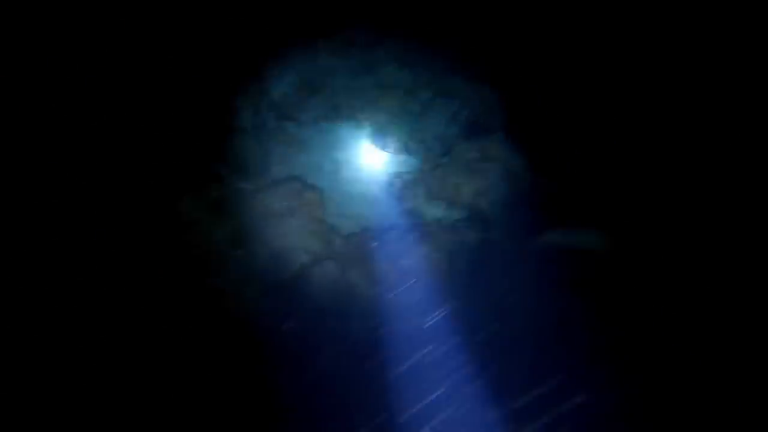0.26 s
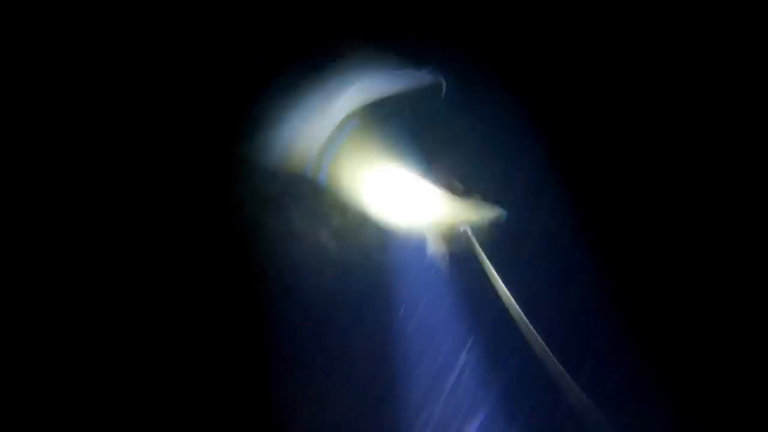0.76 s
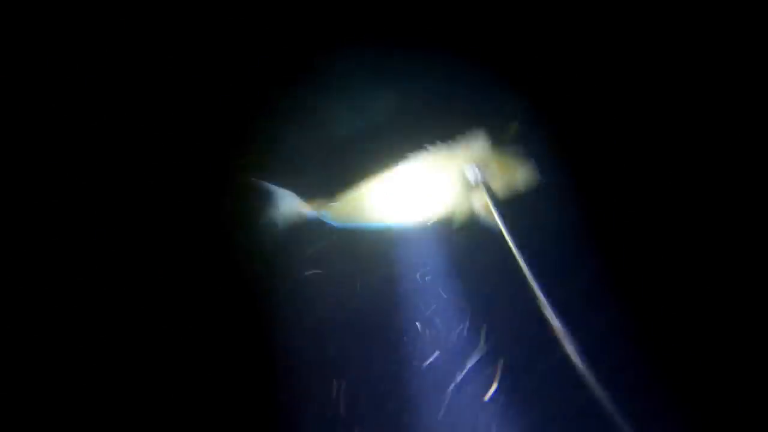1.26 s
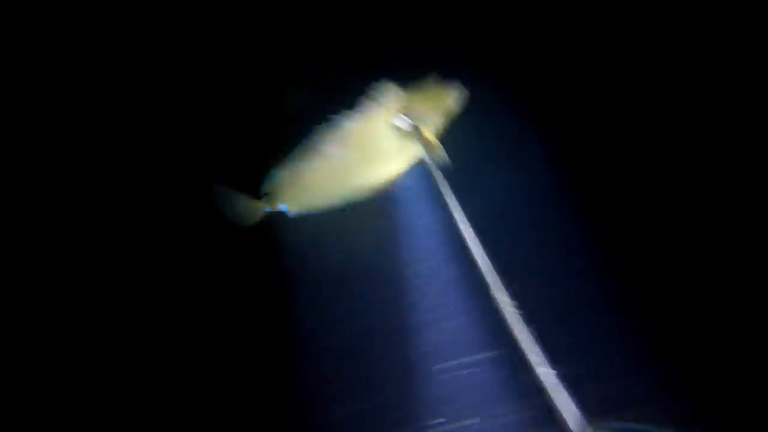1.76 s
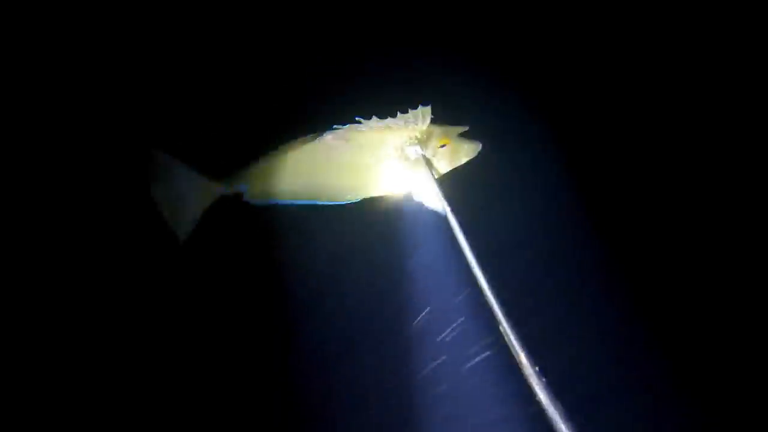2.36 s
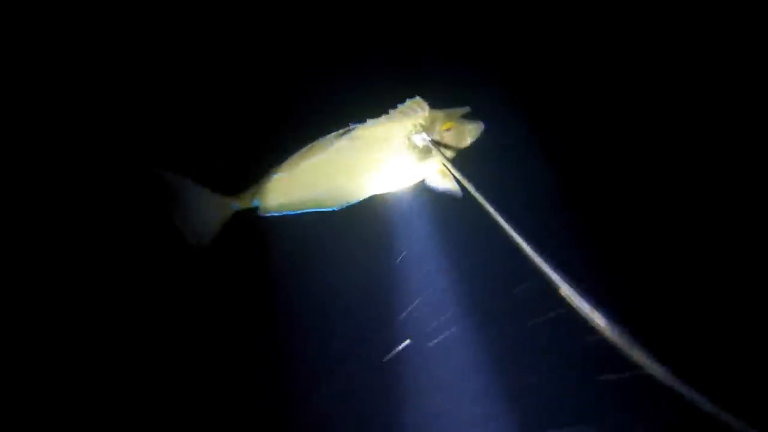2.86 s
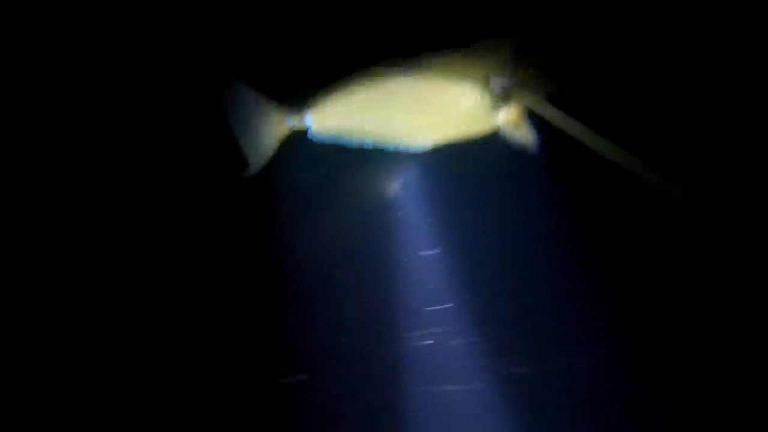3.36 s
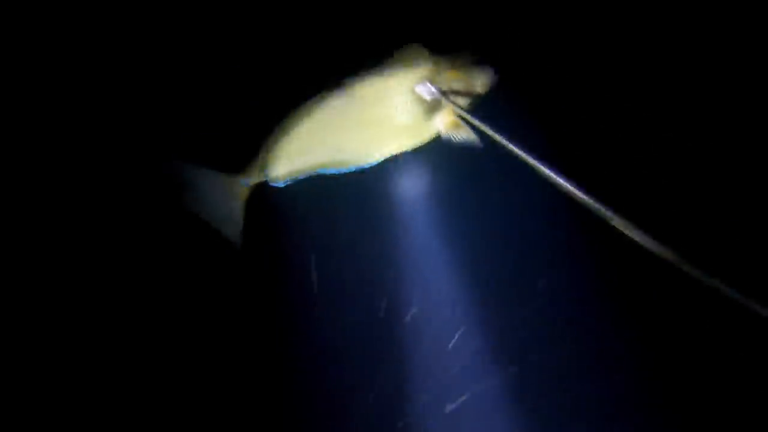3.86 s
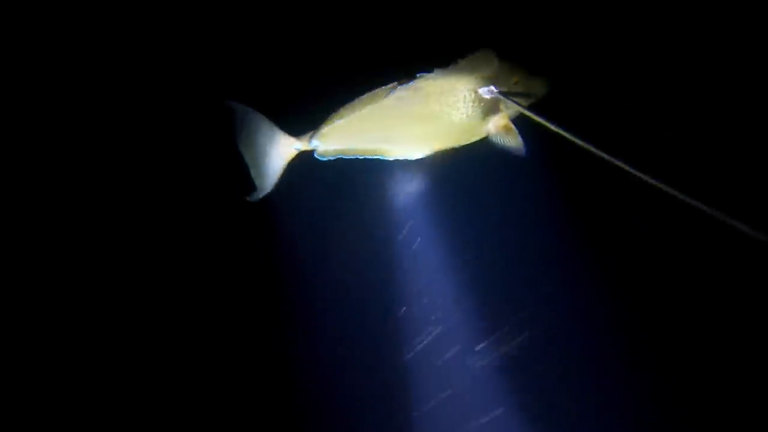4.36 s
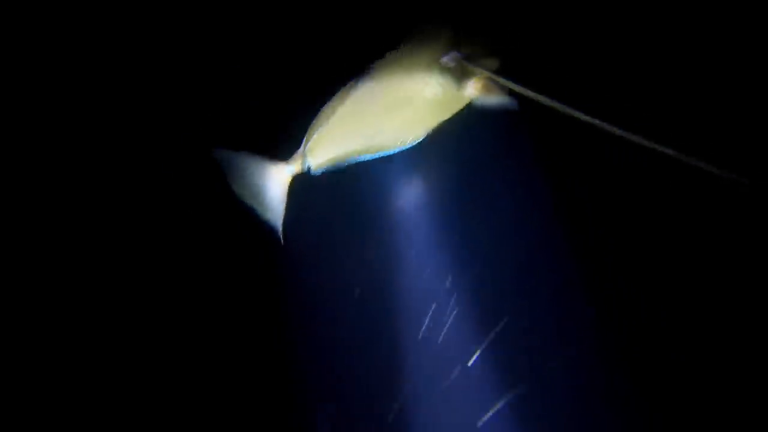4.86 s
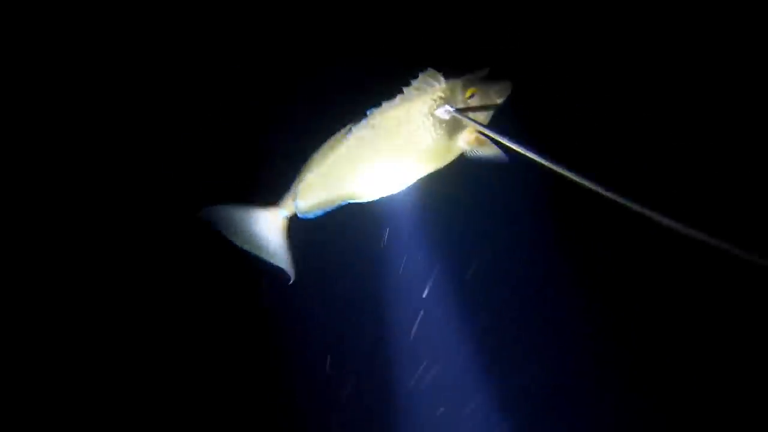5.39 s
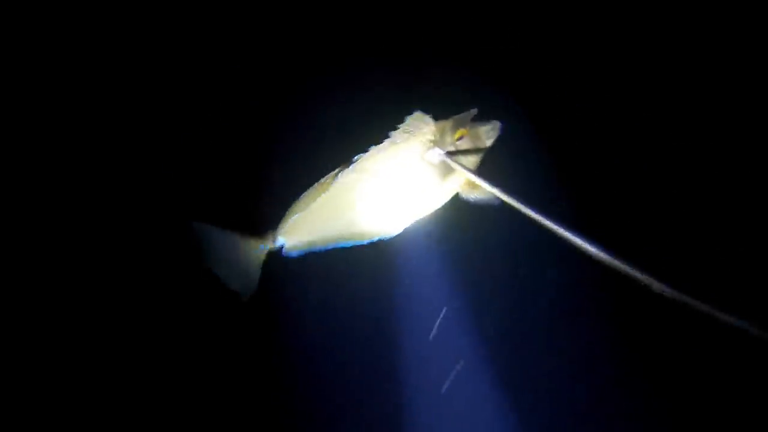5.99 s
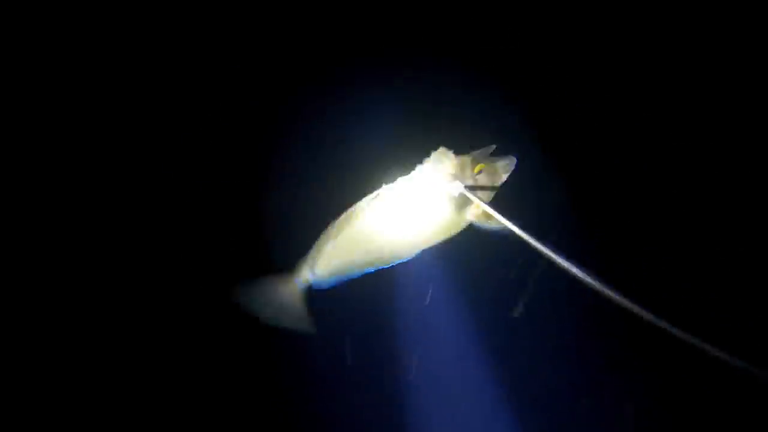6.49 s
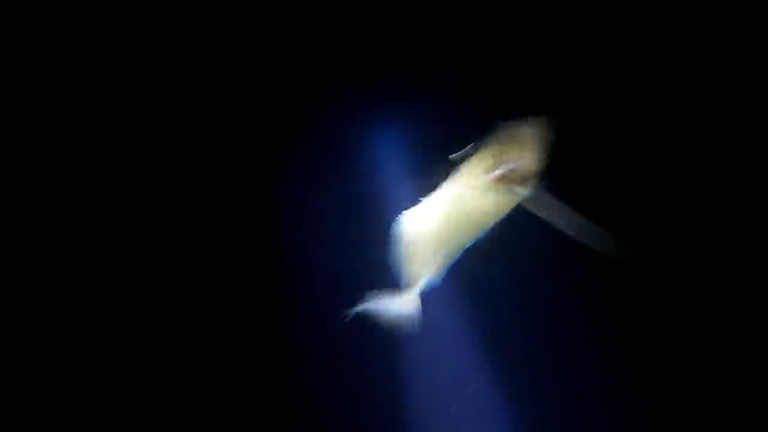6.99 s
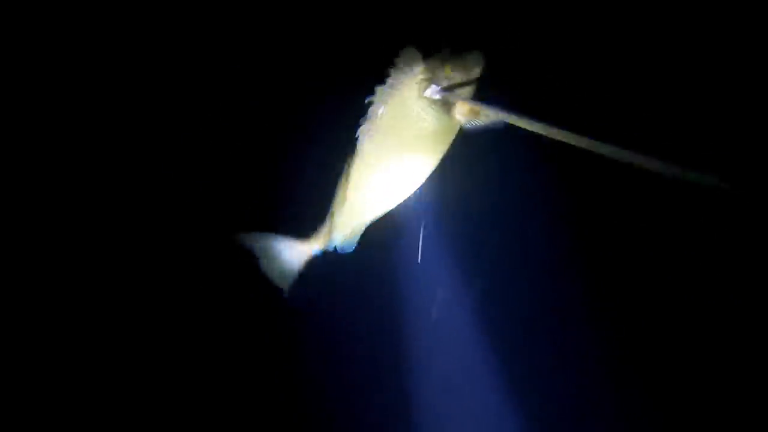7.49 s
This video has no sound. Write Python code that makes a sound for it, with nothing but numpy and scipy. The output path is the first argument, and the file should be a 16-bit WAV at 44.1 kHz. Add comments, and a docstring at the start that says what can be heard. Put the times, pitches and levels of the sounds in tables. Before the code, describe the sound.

Muffled underwater gurgles, sloshes and hollow knocks against a sealed camera housing, with low rumble, then brighter shrimp clicks and a thin hiss.

```python
"""Sealed camera under water, among snapping shrimp

A sealed camera moves through the sea at night. Turbulence rumbles past as shaped noise, and water slosh
excites decaying modes of the housing, which rings low when knocked; bubbles are brief rising sines. Reef shrimp
snap as noise bursts, near and far, over a hiss. The sound starts on one dull microphone for both channels
and fades over to a brighter stereo pair."""
import sys
import numpy as np
from scipy import signal
from scipy.fft import rfft, irfft, next_fast_len
from scipy.io import wavfile
from scipy.ndimage import uniform_filter1d

SR = 44100
rng = np.random.default_rng(int(sys.argv[2]) if len(sys.argv) > 2 else 0)


def wav_out(sig):
    """Save sig, one row per channel (or a flat mono array), as 16-bit PCM at SR to the path in sys.argv[1]."""
    wavfile.write(sys.argv[1], SR, np.round(np.clip(np.atleast_2d(sig).T, -1, 1) * 32767).astype(np.int16))


N = 341334
HZ = np.fft.rfftfreq(16384, 1 / SR)  # frequency grid for filter design


def gain_of(db):
    """Logarithmic level: decibels to amplitude gain."""
    return 10 ** (np.asarray(db) / 20)


def evened(x):
    """Normalisation to unit rms."""
    return x / np.sqrt(np.mean(x ** 2) + 1e-20)


def read_spectrum(points, hz):
    """Interpolation along log frequency: the columns of a spectrum table at hz."""
    f, *values = np.transpose(points)
    return [np.interp(np.log(hz + 1), np.log(f + 1), v) for v in values]


def follow(rows):
    """Linear interpolation in time: the columns of a curve table at every sample."""
    s, *values = np.transpose(rows)
    return [np.interp(np.arange(N) / SR, s, v) for v in values]


def add(mix, s, sound):
    """Superposition: adds a sound to the mix from time s."""
    part = mix[round(s * SR):][:len(sound)]
    part += sound[:len(part)]


def minimum_phase(gain):
    """Minimum-phase principle: the Hilbert transform of log gain gives the phase; taps of energy 1."""
    log_gain = np.log(np.maximum(gain / gain.max(), 1e-5))
    circle = np.concatenate([log_gain, log_gain[-2:0:-1]])
    spectrum = np.exp(np.conj(signal.hilbert(circle)))
    taps = np.fft.ifft(spectrum).real[:4096]
    return taps / np.linalg.norm(taps)


def modal_response(modes, top_hz):
    """Modal superposition: decaying sines, muffled above top_hz by the water-loaded wall; energy 1."""
    t = np.arange(6000) / SR
    taps = np.zeros(6000)
    for hz, width, db in modes:
        taps += gain_of(db) * np.exp(-np.pi * width * t) * np.sin(2 * np.pi * hz * t)
    taps = signal.sosfilt(signal.butter(N=4, Wn=top_hz, fs=SR, output="sos"), taps)
    return taps / np.linalg.norm(taps)


def through(x, taps):
    """Linear filtering: convolution cut to the scene's length."""
    return signal.oaconvolve(x, taps)[:N]


def lumps(per_s):
    """Random modulation: noise smoothed twice into a slow wander of rms 1."""
    span = round(SR / per_s)
    once = uniform_filter1d(rng.standard_normal(N), span)
    return evened(uniform_filter1d(once, span))


def humps(steady_db, column, rows, lag=0, slower=1):
    """Power addition: a steady level plus humps, straight-sided in dB, with heights from one column."""
    t = np.arange(N) / SR - lag
    power = gain_of(2 * steady_db)
    for row in rows:
        s, rise, fall = row[0], row[-2], row[-1]
        drop_db = 20 / slower * np.maximum((t - s) / fall, (s - t) / rise)
        power = power + gain_of(2 * (row[column] - drop_db))
    return 10 * np.log10(power)


# Spectrum of the turbulent rumble before levelling: f/Hz, level/dB per Hz
RUMBLE_SPECTRUM = [(8.8, -27.5), (15, 0), (31, 4.5), (75, -1.5), (119, -12), (160, -15.5), (210, -39.5),
                   (350, -120)]
# Steady flow past the housing: t/s, rumble level/dB, slosh level/dB, upper gurgle level/dB
FLOW = [(0, -37, -42, -58), (.55, -40, -45, -58), (.85, -36, -42, -55), (1.0, -37, -41, -55),
        (1.22, -43, -49, -63), (1.6, -38, -46, -61), (2.07, -38, -46, -61), (2.3, -38, -44, -61),
        (2.8, -36.5, -43, -59), (3.15, -38, -39.5, -57), (3.5, -35.5, -38.5, -57), (4.0, -37, -39, -57),
        (4.6, -36, -38.5, -55), (5.07, -36, -37.5, -56), (5.56, -40, -38.5, -57), (6.2, -35, -39.5, -57),
        (6.6, -33.5, -38, -54), (6.92, -32, -39.5, -57), (7.2, -35, -40, -58.5), (7.74, -31.5, -38, -52)]
# Surges of water against the housing: peak t/s, rumble level/dB, slosh level/dB, upper gurgle level/dB,
# 20 dB rise t/s, 20 dB fall t/s (the rumble stretches both times)
SURGES = [(.235, -38, -34, -37, .16, .04), (.345, -33, -34, -40, .012, .06),
          (.402, -33, -33, -31, .006, .12), (.66, -31, -42, -44, .05, .05), (.71, -33, -24, -33, .03, .05),
          (.82, -31, -27, -45, .03, .05), (.90, -31, -26, -46, .015, .04), (.96, -38, -38, -44, .05, .03),
          (1.035, -36, -32, -44, .02, .07), (1.112, -27, -30, -39, .015, .05),
          (1.35, -39, -33, -34, .02, .1), (1.44, -34, -32, -34, .012, .09),
          (1.857, -17, -28, -32, .008, .03), (2.72, -37, -29.5, -48, .02, 0.2186),
          (2.90, -23, -35.5, -41, .08, .06), (3.30, -30, -32, -42.5, .06, .06),
          (3.64, -27, -32, -46, .1, 0.1227), (3.80, -30, -32.5, -47, .06, 0.11),
          (3.925, -26, -24, -34, .025, 0.0976), (4.19, -32, -35.5, -52, .1, 0.0732),
          (4.49, -28, -22, -48, .1, .07), (4.71, -26, -34.5, -47, .08, .05),
          (4.845, -32, -23, -38, .03, .06), (4.955, -24, -29, -38, .012, 0.09),
          (5.19, -27, -36, -52, .1, 0.073), (5.34, -26, -31, -57.5, 0.11, .15),
          (5.68, -26, -32.5, -44, .09, 0.1166), (5.83, -30, -39.5, -55, .06, .1),
          (6.05, -34, -33, -46, 0.234, .1), (6.42, -31, -31, -34, .1, .08),
          (6.52, -28, -33, -46, .08, 0.1745), (6.68, -32, -35, -42, .06, .06),
          (6.82, -22, -34, -47, 0.04, .05), (6.966, -26, -22, -33, .04, .1),
          (7.06, -15, -23, -45, .03, 0.0663), (7.50, -31, -32, -44, .2, .2),
          (7.73, -23, -35, -45, 0.1237, .08)]
RUMBLE_LAG_S, RUMBLE_SLOWER = .012, 1.3  # the rumble trails a surge and moves more slowly


def rumble():
    """Turbulent pressure fluctuation: low shaped noise on the housing that swells with the flow."""
    noise = through(rng.standard_normal(N), minimum_phase(gain_of(read_spectrum(RUMBLE_SPECTRUM, HZ)[0])))
    level_db = humps(follow(FLOW)[0], 1, SURGES, RUMBLE_LAG_S, RUMBLE_SLOWER)
    return gain_of(level_db) * evened(noise)


# Modes of the housing, the main one last: f/Hz, width/Hz, relative level/dB
HOUSING_MODES = [(157, 79, -11), (245.7, 40, -4.5), (308.5, 56.7, 3.5), (386.48, 38.83, 2)]
# Modes of the upper gurgle: f/Hz, width/Hz, relative level/dB
GURGLE_MODES = [(550.6, 53.6, 1.5), (636, 220, -8), (886, 151, -4.5)]
# Fizz of small bubbles torn loose: f/Hz, width/Hz, relative level/dB
FIZZ_MODES = [(1028, 140, -5), (1563, 270, 2), (2150, 250, -9)]


def slosh():
    """Forced resonance: small slaps of water over a lumpy pressure keep the modes ringing."""
    _, steady_db, steady_upper_db = follow(FLOW)
    level_db = humps(steady_db, 2, SURGES)
    upper_db = humps(steady_upper_db, 3, SURGES)
    slaps = evened(rng.standard_normal(N) * (rng.random(N) < 90 / SR))  # about 90 a second
    pressure = rng.standard_normal(N) * gain_of(2.63 * lumps(46))
    drive = (0.5774 * pressure + 0.778 * slaps) * gain_of(-.5)
    low = through(drive * gain_of(level_db), modal_response(HOUSING_MODES, 588))
    fizz = through(drive * gain_of(upper_db - 13), modal_response(FIZZ_MODES, 2800))
    gurgle = through(drive * gain_of(upper_db), modal_response(GURGLE_MODES, 952.5))
    return low + fizz + gurgle


# Swell of hiss and distant snaps: t/s, level/dB, extra level in the top part/dB
SWELL = [(0, 2, 5), (.35, 3.5, -7.5), (.55, 3, 3.5), (1.3, 3.5, -1.5), (1.6, 3.5, 3), (1.9, 1.5, 2),
         (2.1, 2, 7.5), (3.5, 0, 8.5), (5.3, .5, 12.5), (6.2, .5, 15.5), (6.6, 4, 14), (7.2, -1.5, 16),
         (7.74, -1, 14.5)]
# Short rustles in the hiss and distant snaps: peak t/s, level/dB, level in the top part/dB,
# 20 dB rise t/s, 20 dB fall t/s
RUSTLES = [(1.37, 16, 30, .025, .09), (1.46, 12, 26, .04, 0.07)]


def crackle():
    """Superposed random impulses: far snaps of varied size and hiss, in four uncoloured parts, low to top."""
    happens = rng.random(N) < 260 / SR  # about 260 snaps a second
    size = gain_of(3.3 * np.minimum(rng.exponential(1, N), 3.6)) * happens
    decay = np.exp(-np.arange(600) / SR / 0.00119)
    grit = rng.standard_normal(N)
    far = []
    for _ in range(4):
        varied = size * gain_of(3.77 * rng.standard_normal(N))  # a chance colour for each snap
        far.append(evened(through(varied, decay) * grit))
    hiss = rng.standard_normal(N) * gain_of(1.704 * lumps(40))
    parts = gain_of([[.3], [-1], [-2.5], [-5.5]]) * hiss
    parts = parts + gain_of([[-9], [-4.5], [-2.5], [.3]]) * np.array(far)
    swell_db, extra_db = follow(SWELL)
    top_db = humps(swell_db + extra_db, 2, RUSTLES)
    swell_db = humps(swell_db, 1, RUSTLES)
    return parts * gain_of([swell_db, swell_db, swell_db, top_db])


# Near snaps before the port's colour: t/s, upper middle part's level/dB, then relative to it the
# low part's level/dB, lower middle part's level/dB and top part's level/dB; decay time constant t/s
NEAR_SNAPS = [(.0199, -53, -11, -15, -15, .0028), (.137, -43.5, 4.5, 1.5, -34, .0017),
              (.1715, -54.5, -5, 4, -21, .0017), (.3551, -55, -2, -8.5, -39, .002),
              (.5072, -56, -7, -9, -24, .002), (.9203, -58, -9, -13, -2, .002),
              (1.187, -55.5, 11, -2, -16, .0016), (1.3661, -46, -12, -6, 2, .002),
              (1.4566, -58, 5, -5, -8.5, .002), (1.478, -52.5, 11, 11, -11, .0022),
              (1.5279, -64, 11, 12, -7, .002), (1.8537, -47, 27, 16, 2, .0028),
              (1.925, -58, 16.5, 9, 0, .0019), (1.9509, -48, 19, 11, 4, .0033),
              (2.0028, -56, 8, -6, -33, .002), (2.0479, -59.5, 20, 13, -22, .002),
              (2.1843, -56.5, 15, 3, -22, .002), (2.3402, -45, 9, -1, -27, .0012),
              (2.3956, -49, -6, -17, -35, .002), (2.7214, -34.5, -18, -25, -45, .0028),
              (2.7937, -35.5, 0, -14, -39, .002), (3.0077, -39, -8, -24, -24.5, .0025),
              (3.3235, -43, 11, -14, -32, .0018), (3.3684, -41, 6, -1, -33, .0025),
              (3.4243, -36, -16, -6, -32, .0012), (3.4692, -32, -21, -5, -36, .0007),
              (3.4991, -35.5, -15, -14, -34, .001), (3.5305, -33, -1.5, -16, -36, .002),
              (3.5909, -40, 7, -23, -39, .0023), (3.6508, -35.5, 1, -9, -34, .0014),
              (3.7515, -28.5, -8, -28, -19, .0011), (3.772, -31, -3, -9, -29, .0011),
              (3.8219, -38, -17, -16, -35, .0018), (3.8393, -29, -12, -9, -45, .0033),
              (4.1766, -41, 8, 0, -27, .002), (4.2714, -30, -6, -8, -40, .0017),
              (4.3701, -27, -20, -22, -37, .0012), (4.4315, -20.5, -8, -10.5, -37, .0015),
              (4.5288, -35.5, -8, -18, -33, .0018), (4.5617, -31, -13, -20, -38, .002),
              (4.6355, -37, -6, -21.5, -35, .0016), (4.7059, -39, -13, -16, -29, .0022),
              (4.7443, -32, -4, -16, -26, .0017), (4.7792, -36.5, -15, -23, -37, .0017),
              (4.7967, -38.5, -5, -7, -33, .002), (4.9393, -35, -7, -19, -41, .0013),
              (5.0167, -38, -5, -13, -23, .002), (5.0296, -29, -19, -8, -39, .0027),
              (5.0531, -33, -4, -21, -33, .0038), (5.1728, -30, -16, -27, -39, .0011),
              (5.2002, -39, -4, -25, -31, .0018), (5.2476, -36, -19, -25, -18, .0019),
              (5.2721, -37, -11, -19, -28, .0018), (5.3095, -34, -7, -12, -24, .0025),
              (5.3953, -39, -10, -19, -32.5, .002), (5.4693, -41, 0, 1, -26, .002),
              (5.6348, -37.5, -3, 2, -35, .0025), (5.7006, -34.5, 4, -5, -34, .0026),
              (5.7839, -35.5, -15, -13, -43, .0015), (5.8528, -25.5, -12, -7, -39, .0018),
              (6.0184, -37.5, -16, -13, -25, .0028), (6.0678, -30, -6, -30, -42, .0015),
              (6.1311, -36, -6, -27, -27, .0013), (6.1486, -36, -3, -22, -20, .0011),
              (6.188, -30.5, -14, -17, -23, .0047), (6.3002, -39, -13, -23, -11, .0022),
              (6.3426, -39, -1, -22, -27, .002), (6.421, -35, -8, -1, -34, .0045),
              (6.4938, -30.5, -8, -9, -25, .002), (6.5626, -36.5, -11, -23, -32, .0016),
              (6.7283, -36.5, -11, 1.5, -34, .0012), (6.8021, -28, -3, -9, -35, .006),
              (6.9682, -35.5, .5, 0, -28, .0013), (7.0805, -29, -15, -15, -30, .002),
              (7.1448, -37, -16, -23, -39, .0022), (7.2022, -33, -9.5, -18, -33, .0016),
              (7.2366, -37.5, -11, -6, -42, .002), (7.2845, -37.5, -18, -29, -15, .0015),
              (7.4357, -36, -12, -23, -20, .0028), (7.4806, -33.5, -7, -17, -32, .0038),
              (7.6332, -21.5, -4, -13, -35, .006)]


def near_snaps():
    """Impulsive radiation and reflection: decaying bursts with a reef tail, in four parts, low to top."""
    parts, t = np.zeros((4, N)), np.arange(1500) / SR
    rough = rng.standard_normal((len(NEAR_SNAPS), 1500))
    for (s, db, low_db, lower_middle_db, top_db, length), noise in zip(NEAR_SNAPS, rough):
        burst = noise * (np.exp(-t / max(length, .0003)) + .06 * np.exp(-t / .008))
        burst = burst + .2 * np.roll(burst, 420) * (t > 420 / SR)  # an echo off the reef
        burst /= np.linalg.norm(burst)
        for part, part_db in zip(parts, (low_db, lower_middle_db, 0, top_db)):
            add(part, s, gain_of(db + part_db) * burst)
    return parts


# A swarm of bubbles, one row: start t/s, end t/s, central level/dB, low f/Hz, high f/Hz, central t60/s
SWARM = (6.25, 6.95, -43, 1050, 2100, .022)


def swarm(count=45):
    """Random superposition: rows for bubbles of chance time, level, pitch and decay."""
    start, end, db, low_hz, high_hz, t60 = SWARM
    rows = []
    for a, b, c, d in rng.random((count, 4)):
        pitch_hz = low_hz * (high_hz / low_hz) ** c
        rows.append((start + a * (end - start), db + 8 * (b - .5), pitch_hz, t60 * (.5 + d)))
    return rows


# Single small bubbles: t/s, level before decay/dB, starting f/Hz, t60/s
BUBBLES = [(1.17, -43, 2200, 0.0238), (1.203, -43.5, 1873, 0.027), (1.523, -43, 1966, 0.037),
           (1.551, -46.5, 2720, 0.04), (2.542, -42.5, 1865, 0.055), (4.28, -32.5, 1547, 0.0354),
           (6.263, -34, 1453, 0.06), (6.335, -42, 1998, 0.054), (6.51, -36.5, 1680, 0.061),
           (6.683, -31.5, 1352, 0.0706), (6.719, -34, 1471, .04), (6.728, -33, 2135, 0.044),
           (6.814, -36, 1500, 0.081), (7.215, -40.5, 2205, 0.0395), (7.643, -29.5, 1553, .05)]


def bubbles():
    """Volume resonance: each bubble rings once as a decaying sine, rising a little in pitch."""
    out, t = np.zeros(N), np.arange(3000) / SR
    onset = 1 - np.exp(-t / 0.00034)
    for s, db, hz, t60 in BUBBLES + swarm():
        tone = np.sin(2 * np.pi * hz * (t + 1.6 * t ** 2))
        add(out, s, gain_of(db - 60 * t / t60) * onset * tone)
    return out


# Knocks on the housing: t/s, main mode's peak level/dB, gulp level relative to it/dB, gulp f/Hz,
# upper gurgle level relative to it/dB, rise time constant t/s
KNOCKS = [(.239, -20, -37, 258, -30, .0066), (.338, -33, -5, 200, -6, .003),
          (.348, -27.5, -11, 186, -32, .0069), (.398, -27, 0, 278, 4, .004),
          (.706, -16.5, -7, 182, -20, .008), (.822, -31, -5, 258, -40, .015),
          (.843, -31, 8, 124, -31, .0041), (.896, -18, -1, 109, -16, .0049),
          (1.11, -19.5, -7, 148, -14, .0043), (1.437, -30, -5, 200, -4, .003),
          (1.857, -27, 2, 290, 6, .004), (2.298, -32.5, -5.5, 256, -21, .024),
          (2.42, -35, -12, 250, -14, .008), (2.534, -33.5, -8, 242, -14, .008),
          (2.714, -24.5, -12, 256, -27, .0095), (2.758, -27, -25, 229, -34, .014),
          (2.949, -30, -26, 110, -25, .02), (3.062, -30.5, -3.5, 109, -10, .0057),
          (3.175, -29, -11, 267, -36, .0043), (3.273, -26.5, -8, 240, -33, .017),
          (3.357, -30, -3, 136, -28, .0039), (3.393, -31.5, -22, 135, -19, .0054),
          (3.529, -31.5, -2, 278, -24, .008), (3.605, -26.5, 1.5, 113, -27, .012),
          (3.908, -24.5, 1, 249, -30, .022), (3.917, -26, -19, 200, 2, .003),
          (3.934, -10.5, -3, 167.5, -40, .013), (4.106, -29.5, -2, 233, -25, .005),
          (4.45, -21, -30, 269, -37, .022), (4.496, -13, -33, 269, -31, .01),
          (4.62, -26.5, -21, 110, -32, .0047), (4.743, -31, -12, 111, -19, .017),
          (4.832, -16, -16, 144, -32, .0029), (4.855, -29, -8, 200, 1, .003),
          (4.952, -20, -30, 263, -4, .0029), (5.006, -24.5, -21, 144, -25, .0049),
          (5.044, -28.5, -7, 138, -26, .0061), (5.11, -29, -3, 216, -27, .0037),
          (5.285, -27.5, -4, 238, -30, .0058), (5.42, -28.5, -25, 148, -23, .01),
          (5.654, -27.5, -19, 109, -14, .0065), (5.725, -31.5, -5, 109, -12, .014),
          (6.007, -40.5, 15, 179, -21, .022), (6.381, -30, 2.5, 110, -3, .0091),
          (6.394, -34, -8, 200, 1, .003), (6.412, -32, -8, 200, 2, .003), (6.426, -24, -6, 274, -2, .003),
          (6.455, -22, -9, 221, -9, .0029), (6.525, -31.5, -3.5, 151, -24, .0053),
          (6.551, -29.5, -9, 145, -11, .012), (6.734, -22.5, -24, 262, -36, .008),
          (6.951, -28, 6, 107, -18, .007), (6.968, -18.5, 0, 113, -22, .008),
          (7.051, -12, -3, 180, -18, .0072), (7.118, -25, -18, 129.5, -31, .022),
          (7.216, -33, -27, 110, -28, .0064), (7.384, -33, -5, 145, -24, .014)]
SPLASH_S = .0025  # time to the envelope peak is half of this


def knocks():
    """Transient excitation: a soft push swells main mode and trapped-air gulp; its rough start rings the gurgle."""
    out, t = np.zeros(N), np.arange(4000) / SR
    rough, turns = rng.standard_normal((len(KNOCKS), 1500)), rng.random((len(KNOCKS), 3))
    upper = modal_response(GURGLE_MODES, 1390)
    main_hz, main_width, _ = HOUSING_MODES[-1]
    main_decay = np.exp(-np.pi * 1.3 * main_width * t)
    u = t[:1500] / SPLASH_S
    for (s, db, gulp_db, gulp_hz, upper_db, rise), noise, (a, b, c) in zip(KNOCKS, rough, turns):
        swell = (1 - np.exp(-t / max(rise, .001))) ** 2
        hz = main_hz * (1 + 0.0727 * (c - .5))  # slightly detuned at each knock
        main = swell * main_decay * np.sin(2 * np.pi * (hz * t + a))
        gulp = swell * np.exp(-t / 0.01026) * np.sin(2 * np.pi * (gulp_hz * t + b))
        splash = signal.oaconvolve(noise * u * np.exp(-2 * u), upper)
        # the slow swells start 3 ms ahead of the splash
        for ring, part_db, early in ((main, 0, .003), (gulp, gulp_db, .003), (splash, upper_db, 0)):
            add(out, s - early, gain_of(db + part_db) * ring / abs(ring).max())
    return out


def microphone(slope, peaks, far, snaps, far_db, dip_db):
    """Spectral colouring: waterborne sound takes one port's slope, shifted by dip_db, and its resonances."""
    power = gain_of(2 * (read_spectrum(slope, HZ)[0] + dip_db))
    for hz, width, db in peaks:
        power = power + gain_of(2 * db) / (1 + (2 * (HZ - hz) / width) ** 2) ** 2
    # share of power above each crossover; neighbours differ by one part's band
    above = [1, *(1 / (1 + (hz / (HZ + 1)) ** 16) for hz in (2300, 4200, 10300)), 0]
    out = np.zeros(N)
    for lower, upper, distant, near in zip(above, above[1:], far, snaps):
        part = power * abs(lower - upper)
        colour = np.sqrt(part)
        part_gain = np.sqrt(part.sum() / power.sum())
        out += gain_of(far_db) * part_gain * through(distant, minimum_phase(colour))
        # near snaps are brighter and flatter
        out += gain_of(13.5) * through(near, minimum_phase(colour ** 0.962 * HZ ** 0.26))
    return out


# Left port against right: f/Hz, level/dB, phase lead/rad
LEFT_PORT = [(110, -4, 0.13), (150, -5, 0.49), (550, -7.5, 1), (830, -4, 0.96), (950, -2, .7),
             (1090, -15.5, 0.9), (1330, -9, 0.86), (1900, -2, 0.47), (2650, -7.5, .5), (3500, -5, 0.42),
             (7000, 0, 0.15), (11630, 3, .1), (14000, -55, .1)]
# Spectrum of each port's own noise before levelling: f/Hz, level/dB
OWN_NOISE = [(500, -14.5), (800, -9.5), (1500, -42.5), (3000, -6), (7000, -17), (10000, -1.5), (13000, 2),
             (15500, -11.5)]


def spread(mid):
    """Interchannel level and phase difference: left is altered against right; each port adds its own noise."""
    size = next_fast_len(N)
    db, ahead = read_spectrum(LEFT_PORT, np.fft.rfftfreq(size, 1 / SR))
    left = gain_of(db) * np.exp(1j * ahead)
    right = 2 * rfft(mid, size) / (1 + left)  # the two ports still average to mid
    taps = minimum_phase(gain_of(read_spectrum(OWN_NOISE, HZ)[0]))
    own = np.array([through(rng.standard_normal(N), taps) for _ in "lr"])
    return irfft([left * right, right], size)[:, :N] + gain_of(-81.0) * own


# Slopes of the dull microphone and of the pair, before a common shift: f/Hz, level/dB per Hz
DULL_SLOPE = [(410, -22), (700, 0.5), (1130, -11.5), (1490, 3), (2610, -13), (2890, -13.5), (4690, -23),
              (5620, -28), (6160, -28), (8420, -25), (9970, -36.5), (10800, -53.5), (12400, -27),
              (15700, -68.5)]
PAIR_SLOPE = [(410, -59), (700, -0.5), (851, -18.5), (1090, -2), (1320, 11), (1760, -4), (2570, -11.5),
              (3710, -18.5), (4750, -7.5), (6000, -11.5), (6930, -4), (9720, -33.5), (12100, -45.5),
              (15700, -64)]
# Resonances of the dull microphone and of the pair: f/Hz, width/Hz, level/dB
DULL_PEAKS = [(1513, 170, -2.5), (2898, 120, -8.5), (5634, 310, -16), (6712, 91, -18.5),
              (13800, 4400, -35.5)]
PAIR_PEAKS = [(1115.9, 65.9, 11), (1420, 192, 11), (2237, 58, -10.5), (2908, 180, -8), (3497, 120, -9.5),
              (3889, 81, -10.5), (4418, 186, -6.5), (4924, 100, -0.5), (5512, 280, -4.5), (6910, 410, -16),
              (8035, 240, -14), (11816, 660, -31.5)]
DULL_FAR_DB, PAIR_FAR_DB = -65, -49.5  # gain of hiss and distant snaps
# Crossfade from dull microphone to pair: t/s, share of the pair (0 to 1)
FADE = [(2.07, 0.0032), (2.3, 0.151), (2.6, 0.474), (3, 0.579), (3.4, 0.956), (3.7, 0.995)]


def scene():
    """Superposition: both pick-ups hear the housing alike and the water each in its own colour."""
    body = rumble() + slosh() + knocks() + bubbles()
    far, snaps = crackle(), near_snaps()
    dull = body + microphone(DULL_SLOPE, DULL_PEAKS, far, snaps, DULL_FAR_DB, -1.8)
    high_pass = signal.firwin(255, 12500, fs=SR, pass_zero=False)
    top = signal.oaconvolve(dull, high_pass, "same")
    dull = dull + 0.98 * np.array([-top, top])  # only the very top leans right
    pair = spread(body + microphone(PAIR_SLOPE, PAIR_PEAKS, far, snaps, PAIR_FAR_DB, -0.92))
    share = np.clip(follow(FADE)[0], 0, 1)
    return (1 - share) * dull + share * pair


EDGE_HZ = 15850


def record(dry):
    """Band limitation: a linear-phase low-pass at EDGE_HZ."""
    low_pass = signal.firwin(511, EDGE_HZ, window=("kaiser", 9), fs=SR)
    return signal.oaconvolve(dry, low_pass[None], "same")


dry = scene()
out = record(dry)
wav_out(out)
```